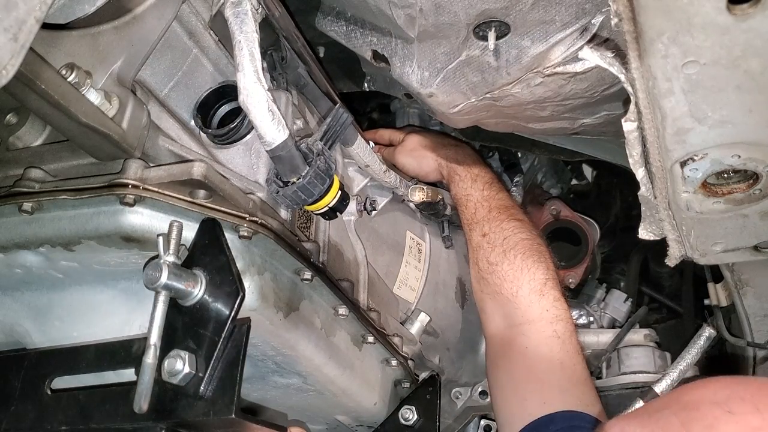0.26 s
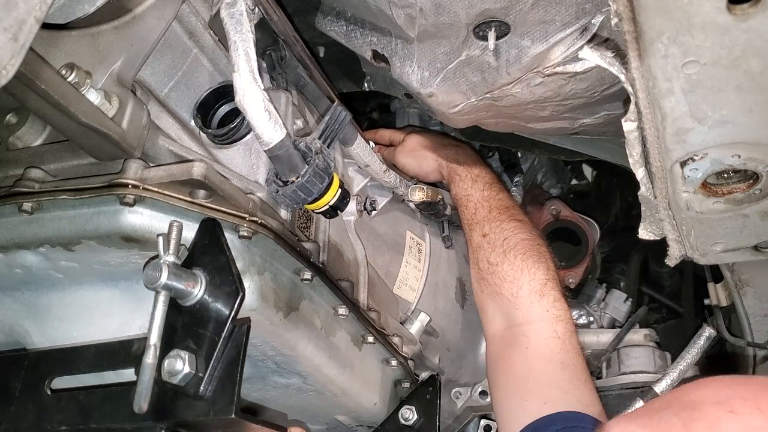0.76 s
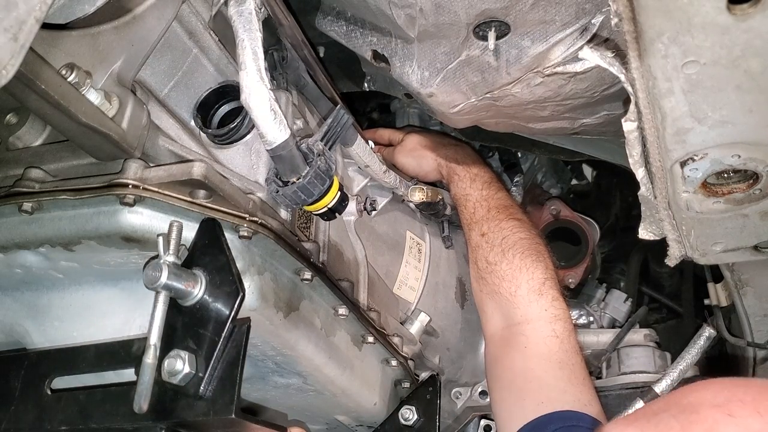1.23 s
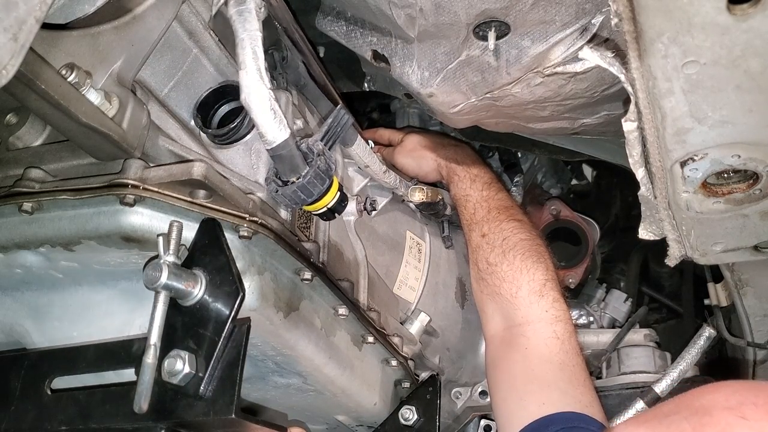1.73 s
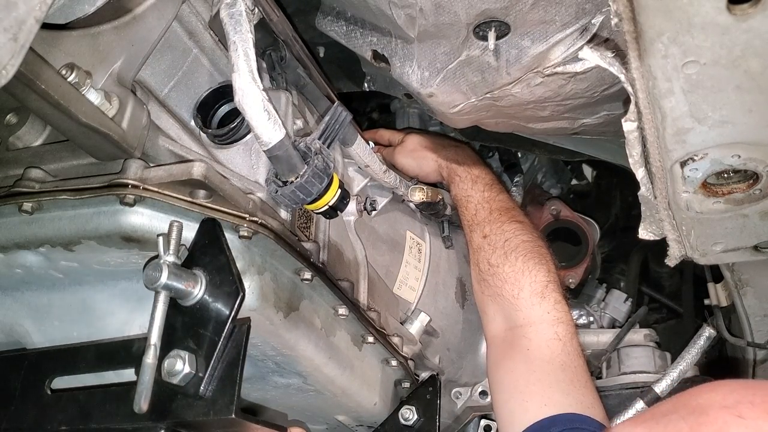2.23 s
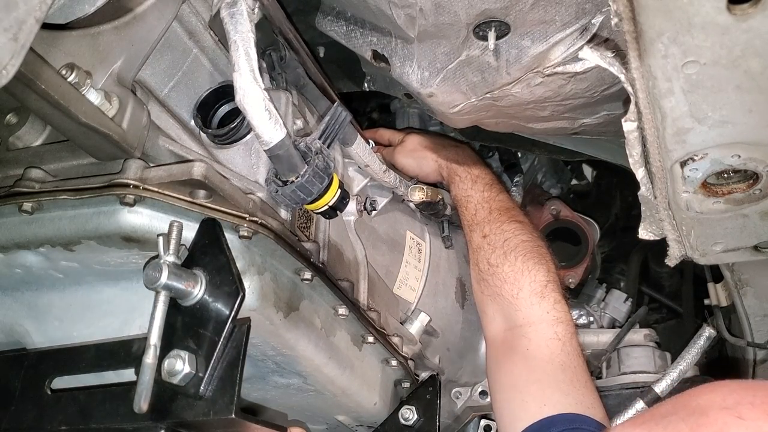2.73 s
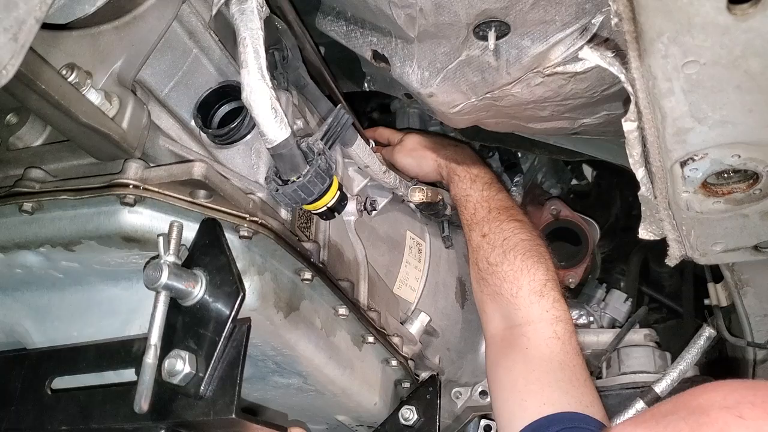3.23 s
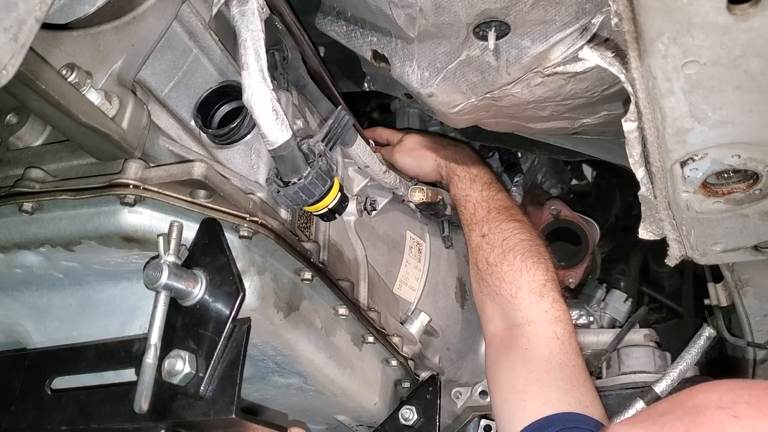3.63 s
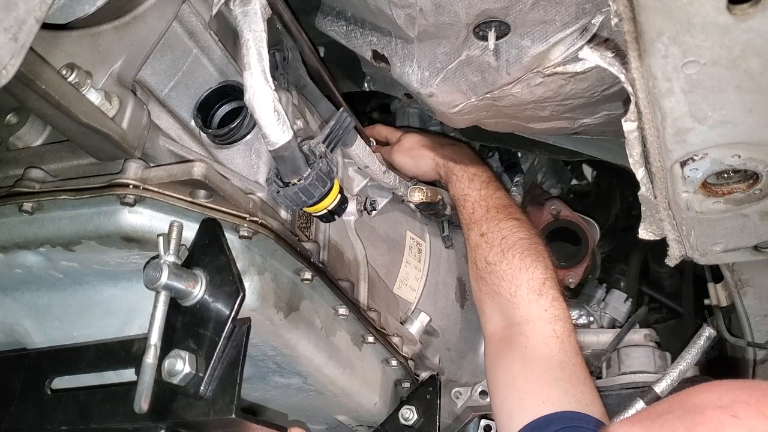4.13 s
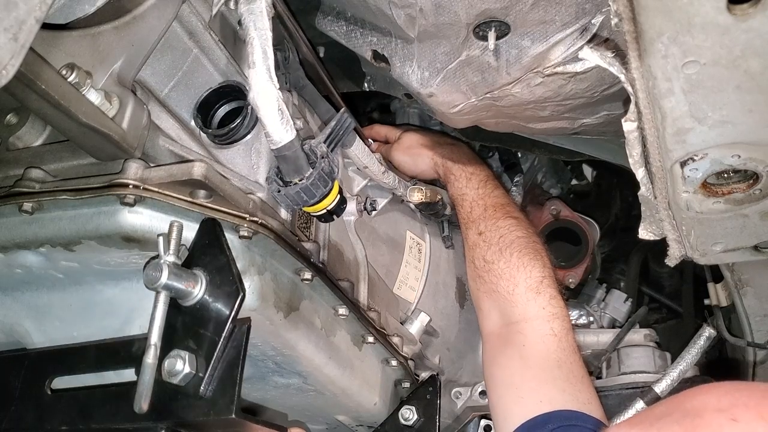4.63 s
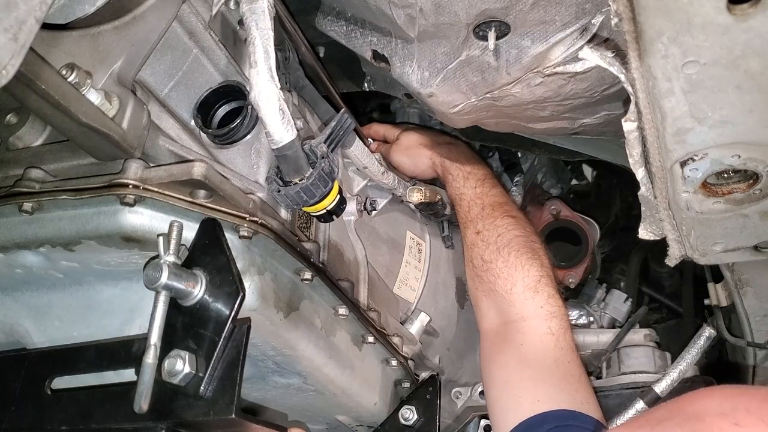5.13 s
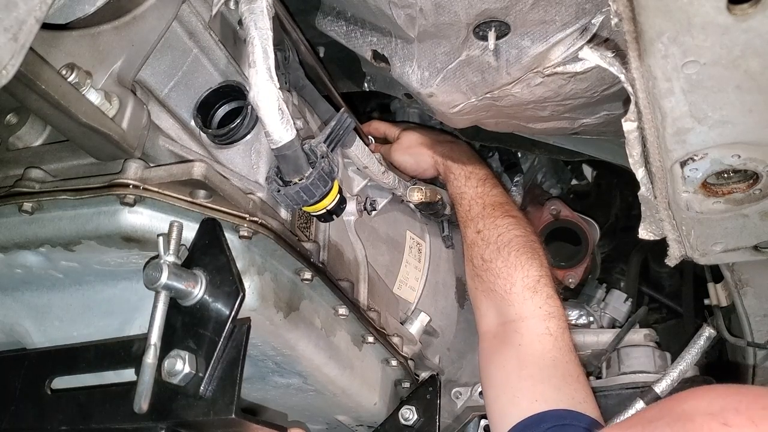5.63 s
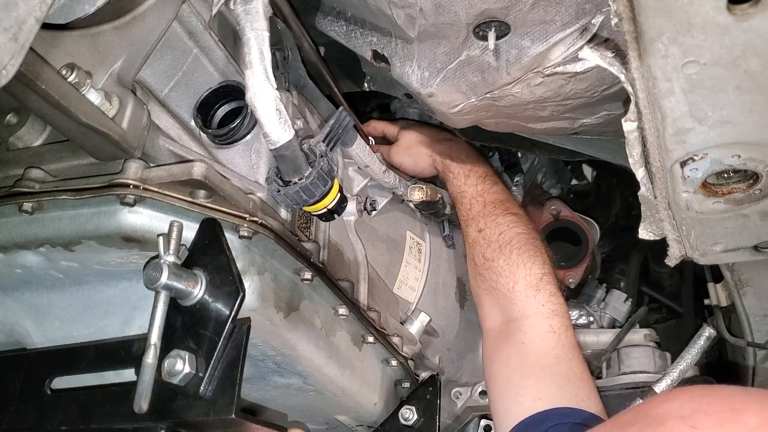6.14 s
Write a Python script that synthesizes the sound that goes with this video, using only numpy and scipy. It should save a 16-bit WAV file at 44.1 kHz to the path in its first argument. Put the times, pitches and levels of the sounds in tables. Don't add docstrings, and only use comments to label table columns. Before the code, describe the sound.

Inside a garage, a low machine hum swells. A trigger clicks and a cordless ratchet close by bursts into harsh metallic clatter, straining at a tight bolt for about half a second before speeding up. It coasts into separating ticks, with small scrapes and soft knocks in the pause. A second pull spins up fast and runs on as an even, softer rattling buzz with a growing gear whine. Close stereo microphone, tool to the left.

```python
import sys
import numpy as np
from scipy import signal
from scipy.fft import rfft, irfft, next_fast_len
from scipy.io import wavfile
from scipy.ndimage import uniform_filter1d, minimum_filter1d

SR = 44100
rng = np.random.default_rng(int(sys.argv[2]) if len(sys.argv) > 2 else 0)


def dump_mix(stems):
    frames = np.atleast_2d(stems).T
    limited = np.clip(frames, -1, 1)
    pcm = np.round(limited * 32767).astype(np.int16)
    wavfile.write(sys.argv[1], SR, pcm)


def linear_from_db(decibels):
    return 10 ** (np.asarray(decibels, float) / 20)


N = 280917
TIME = np.arange(N) / SR
PAUSE_S = 2.35
PORT_LAG = 20.67

# start in seconds, rise in seconds, rise in dB per decade of time, held level in dB.
RUNS = [
    (.931, 0.1, 13.5, -16),
    (2.67, 0.13, 45, -20),
]


def after(s):
    return np.maximum(TIME - s, 0)


def shape(rows, k, size):
    rows = np.array(rows, float)
    return np.interp(np.log(np.fft.rfftfreq(size, 1 / SR) + 1), np.log(rows[:, 0]), rows[:, k])


def unit(x):
    return x / np.sqrt(np.mean(x ** 2))


def band(x, lo_hz, hi_hz):
    return signal.sosfilt(signal.butter(3, [lo_hz, hi_hz], "band", fs=SR, output="sos"), x)


def walk(rate):
    k = int(SR / rate)
    held = np.repeat(rng.standard_normal(800), k)[:N]
    return unit(uniform_filter1d(uniform_filter1d(held, k), k))


def fade(x, ms):
    r = np.exp(-2000 / (ms * SR))
    return signal.lfilter([1 - r], [1, -r], x)


def ports(direct, other, share=0.98):
    # frequency in Hz, left minus right in dB, likeness of the ports from 0 to 1.
    port_rows = [(60, 0, 1), (200, 4, 0.94), (400, 5.5, 0.87), (682, 7, 0.76), (1300, 2.5, 0.18),
                 (2200, 6, 0), (4250, 7, 0), (6160, 15, 0.92), (8000, 7, 0.05), (9460, 2.5, 0.54),
                 (10670, 11.5, 0), (13740, 16.5, 0.2), (15350, 16.5, .3)]
    size = next_fast_len(N)
    like = np.clip(shape(port_rows, 2, size), 0, 1)
    late = np.exp(-2j * np.pi * np.arange(size // 2 + 1) * PORT_LAG * share / size)
    right = like * late * rfft(direct, size) + np.sqrt(1 - like ** 2) * rfft(other, size)
    right = right * linear_from_db(-share * shape(port_rows, 1, size))
    return np.array([direct, irfft(right, size)[:N]])


def shop():
    # frequency in Hz, level in dB per Hz.
    wash_rows = [(25, -21.5), (45, -28), (95, -6.5), (190, -15.5), (300, -19), (600, -25.5), (1100, -27.5),
                 (2000, -29.5), (4000, -34), (6800, -39), (7400, -46), (10000, -47.5), (13500, -46),
                 (15900, -61)]
    # frequency in Hz, width in Hz, level in dB.
    hum_rows = [(60.6, 19, -6.5), (87.6, 9.6, 5), (120.8, 3.8, -6), (263, 39, -13.5), (404, 11.5, -14.5),
                (575, 19, -17), (824, 35, -17.5)]
    size = next_fast_len(N)
    hz = np.fft.rfftfreq(size, 1 / SR)
    hum = sum(linear_from_db(db) ** 2 / (1 + ((hz - f) / width * 2) ** 4) for f, width, db in hum_rows)
    colour = np.sqrt(linear_from_db(shape(wash_rows, 1, size)) ** 2 + hum)
    paths = irfft(rfft(rng.standard_normal((2, size))) * colour, size)[:, :N]
    wash = ports(*paths, share=0.41)
    start_s = RUNS[0][0]
    swell_db = np.interp(TIME, [0.26, start_s], [0, 6])
    duck_db = -18.5 * (1 - np.exp(-after(start_s) / 0.39))
    return wash / np.std(band(wash.mean(0), 40, 125)) * linear_from_db(-45.5 + swell_db + duck_db)


def bumps():
    # start in seconds, frequency in Hz, peak level in dB, decay in ms.
    thuds = [
        (.859, 4600, -33, 1.8),
        (.866, 4200, -35, 3),
        (.9, 260, -49, 21),
        (.968, 900, -29, 9.9),
        (2.268, 205, -50.5, 21),
        (2.367, 189, -48, 23),
        (2.398, 1130, -46.5, 10),
        (2.787, 165, -41, 10),
        (2.839, 152, -43, 40),
        (2.84, 970, -35, 40),
    ]
    scrapes = [
        (2.094, 3160, -30, 6.1),
        (2.094, 11000, -28, 4),
        (2.246, 11000, -48, 3.9),
        (2.246, 4500, -46.5, 5.4),
        (2.398, 2660, -47.5, 7.3),
        (2.639, 4500, -52, 2.9),
    ]
    pings = [
        (.0, 2030, -55, 60),
        (1.006, 8600, -12, 4),
        (2.636, 6800, -59, 7),
    ]
    contact = [(0.3, 0.24), (0.88, 0.46), (.08, 0.1)]
    out, ms = np.zeros((2, N + 8192)), np.arange(8192) / SR * 1000
    for table, (wide, soft) in zip((thuds, scrapes, pings), contact):
        for s, hz, db, decay_ms in table:
            width, rise_ms = wide * hz, soft * decay_ms
            swell = (1 - np.exp(-ms / rise_ms)) ** 2 * np.exp(-ms / decay_ms)
            noise = band(rng.standard_normal((2, 16384)), hz - width / 2, hz + width / 2)[:, 8192:] * swell
            i = int(s * SR)
            out[:, i:i + 8192] += linear_from_db(db) * noise / abs(noise).max(1, keepdims=True)
    return out[:, :N] * linear_from_db(5.5)


def whine():
    # start in seconds, end in seconds, frequency in Hz, level in dB.
    whines = [
        (0.905, 0.928, 8000, -35.5),
        (2.658, 2.705, 8000, -61),
    ]
    out = 0
    for t0, t1, hz, db in whines:
        swell = np.interp(TIME, [t0, t0 + .7 * (t1 - t0), t1], [0, 1, .3], 0, 0)
        out = out + linear_from_db(db) * swell * np.sin(2 * np.pi * hz * TIME)
    return out


def gears(speed):
    # multiple of the crank rate, level in dB.
    orders = [(1, -65), (2, -68.5), (3, -64), (4, -63), (5, -69.5), (6, -90.5), (10, -63)]
    angle = 2 * np.pi * np.cumsum(uniform_filter1d(speed, SR // 10)) / SR
    shake = sum(linear_from_db(db + 3.8 * walk(rate=4.4)) * np.sin(k * angle + k * k) for k, db in orders)
    shake = shake * np.clip((speed - 15) / 30, 0, 1) * linear_from_db(9.5 * (TIME < PAUSE_S))
    mesh_teeth, freed_s = 42, 3.76
    mesh_hz = mesh_teeth * uniform_filter1d(speed, SR // 2) + 14.0 * walk(rate=12)
    mesh = np.sin(2 * np.pi * np.cumsum(mesh_hz) / SR)
    mesh_db = np.where(TIME < freed_s, -65, -51 + 4.5 * after(freed_s))
    mesh_db = uniform_filter1d(mesh_db, SR // 10) + 4.5 + 2.1 * walk(rate=15)
    return shake + mesh * linear_from_db(mesh_db) * (speed > 51)


def burst(decay_ms, tail_db, tail_ms):
    t = np.arange(4096) / SR * 1000
    fall = 2.1 * np.exp(-t / 0.81) + np.exp(-t / decay_ms) + linear_from_db(tail_db) * np.exp(-t / tail_ms)
    return rng.standard_normal((2, len(t))) * fall


def ticks():
    # start in seconds, peak level in dB, dull share in dB.
    pawl = [
        (0.497, -15.5, -14.5),
        (1.7409, -10.5, -8),
        (1.871, -8.5, -31),
        (2.0542, -13.5, -14),
        (2.171, -14.5, -17),
        (2.2055, -15.5, -14),
        (2.7281, -6.5, -22),
    ]
    slack = [(0.86, -31, -6), (0.898, -42, -14.5), (0.9327, -0.5, -14), (0.9497, -2, -9),
             (0.9645, -5.5, -21), (0.988, -15, -21), (0.9986, -6, -6), (1.0063, -7, -25.5),
             (1.5894, -14, 1), (1.6604, -12, -6), (1.6886, -15, -5), (1.7511, -6, -19), (1.7933, -27, -6),
             (1.8556, -17, -23), (2.035, -30, -7), (2.3092, -46, -6), (2.3997, -44, -7), (2.6399, -50, -11),
             (2.7, -37, -12), (2.7153, -20, -15)]
    strain = [
        (1.0284, -8, -3.5),
        (1.0364, -22, -7.5),
        (1.0444, -9, -3),
        (1.0574, -4, 0.5),
        (1.0664, -4, -4),
        (1.0754, -18, -1),
        (1.1014, -5.5, -11),
        (1.1124, -10, -7),
        (1.1194, -5, -3.5),
        (1.1374, -5.5, -9),
    ]
    knock_rows = [(*row, 3.6) for row in pawl] + [(*row, 2.6) for row in slack + strain]
    pan_db = np.array([[0], [13.5]])
    out = np.zeros((2, N + 4096))
    for s, db, dull_db, decay_ms in knock_rows:
        crack = burst(decay_ms, -17, 9.0)
        crack[1] = .5 * np.roll(crack[0], int(PORT_LAG)) + 0.85 * crack[1]
        bright, dull = band(crack, 6900, 15350), band(crack, 1900, 7100)
        tick = bright / abs(bright).max() + linear_from_db(dull_db + 9.5) * dull / abs(dull).max()
        tick = tick / abs(tick[0]).max() * linear_from_db(db + 2.5 - pan_db)
        i = int(s * SR)
        out[:, i:i + 4096] += tick
    return out[:, :N]


def effort():
    first, second = (db + slope_db * np.log10(np.clip(after(s) / rise, 1e-5, 1))
                     for s, rise, slope_db, db in RUNS)
    start_s, rise_s = RUNS[0][:2]
    breaks_free_s, recover_s = 1.41, 0.19
    sag_s = [start_s + rise_s, breaks_free_s, breaks_free_s + recover_s]
    first = first + np.interp(TIME, sag_s, [0, -2, 0])
    release_s, stall_s, last_tooth_s = 1.565, 2.076, 2.28
    first = first - 58.5 * after(release_s) - 47 * after(stall_s) - 200 * after(last_tooth_s)
    return np.where(TIME < start_s, -120, np.maximum(first, second))


def balance(k, head_db):
    # tight level in dB, free level in dB,
    # gain in dB per second as the bolt loosens, dB gained per dB of slowing.
    parts = [
        (-7, -12.5, 1.1, 0.01),
        (-20.5, -24.5, 0.75, 0.4432),
    ]
    if k == 0:
        return 0.65 * walk(rate=14)
    tight_db, free_db, loosen_db, slowing = parts[k - 1]
    running = after(RUNS[1][0])
    settle_db = 6.5 * np.exp(-running / 0.27)
    held = np.where(TIME < PAUSE_S, tight_db, free_db + loosen_db * running + settle_db)
    return held + slowing * np.clip(RUNS[1][3] - head_db, 0, 36)


def ring(x, hz, t60):
    r = np.exp(-np.log(1000) / (t60 * SR))
    return unit(signal.lfilter([1, 0, -1], [1, -2 * r * np.cos(2 * np.pi * hz / SR), r * r], x))


def knocks(stroke_db, speed, per_turn, scatter_db):
    draw = rng.random(N) / (per_turn * speed / SR)
    hit, power = draw < 1, np.zeros(N)
    size_db = np.minimum(-scatter_db * np.log(draw[hit] + 1e-9), 10.5) + stroke_db[hit]
    power[hit] = linear_from_db(2 * size_db) / speed[hit]
    return power


def clatter(turns, speed):
    # frequency in Hz, level in dB per Hz.
    tight_colour = [(76, -45), (130, -23), (363, -29), (531, -12.5), (718, -17.5), (1420, -16), (1610, -13),
                    (2760, 0), (3380, -3.5), (4220, -1), (5370, -5), (6430, -1), (7710, -10), (13500, 5),
                    (15900, 2.5)]
    free_colour = [(76, -53), (130, -26.5), (162, -30), (355, -29.5), (553, -17), (1450, -18.5),
                   (1890, -9.5), (2310, -5), (4050, -7), (6180, -6), (7710, -13.5), (8870, -9.5),
                   (11100, -7.5), (13500, -1), (15900, -9)]
    # frequency in Hz, level in dB, time to fall by 60 dB in seconds.
    steel = [(13580, -5, 0.0097), (9670, -1.5, 0.024), (8680, -8, 0.03), (4240, -9, 0.0053),
             (2783, -10, 0.019), (1907, -9.5, 0.039), (1234, -13.5, 0.1), (938, -14.5, 0.047),
             (541, -19.5, 0.033)]
    angle = 2 * np.pi * (turns + 0.0046 + 0.11 * walk(rate=12))
    stroke = np.tanh(2.0 * np.cos(angle)) - 0.26 * np.cos(3 * angle + 0.8) - 0.067 * np.cos(4 * angle + 0.27)
    tight = TIME < PAUSE_S
    shared_db = 2.1 * stroke + np.minimum(3.7 * walk(rate=30), 4.5) + 0.16 * walk(rate=9.0)
    shared = knocks(shared_db, speed, 15.0, 1.48)
    size = next_fast_len(N)
    hz = np.fft.rfftfreq(size, 1 / SR) + 1
    high, mid = (1 / (1 + (edge / hz) ** 8) for edge in (5500, 1600))
    shares = high, mid - high, (1 - mid) / (1 + (130 / hz) ** 4)
    colours = [linear_from_db(shape(table, 1, size)) for table in (tight_colour, free_colour)]
    head_db = effort()
    load_db, load_pan_db = -5, 3.5
    out = 0
    for k, (crack_ms, own, rub) in enumerate([(.9, 0.49, 0.047), (1.3, 1.6, 0.8), (2.5, 3, 1)]):
        power = shared + own * knocks(6.8 * stroke + 1.2 * walk(rate=20), speed, 12.0, 1.6)
        power = fade(power, crack_ms) + .5 * fade(power, 6.0) + rub * power.mean()
        power = power * (power.mean() / uniform_filter1d(power, 1600)) ** .45
        paths = unit(np.sqrt(power) * rng.standard_normal((2, N)))
        hard = np.sqrt(knocks(1.18 * stroke, speed, 1.2, 1.2)) * linear_from_db(load_db * tight * (k > 0))
        for f, db, t60 in steel[3 * k:3 * k + 3]:
            grip_db = 1.5 * walk(rate=9) + 2.5 * walk(rate=2.5)
            struck = hard * (rng.random(N) < .55)
            paths = paths + linear_from_db(db - 16.0 + grip_db) * ring(struck, f, t60)
        spectrum = rfft(paths, size) * np.sqrt(shares[k])
        held, free = (unit(irfft(spectrum * colour, size)[:, :N]) for colour in colours)
        part = ports(*np.where(tight, held, free))
        out = out + part / np.std(part.mean(0)) * linear_from_db(balance(k, head_db))
    pan_db = load_pan_db * tight * np.array([[.1], [-.9]])
    return out * linear_from_db(head_db + pan_db)


def crank():
    # start in seconds, turns per second held until the next row.
    speed_rows = [(.9, 31.95), (1.1, 37.83), (1.4, 47), (1.47, 52.5), (1.55, 47.6), (1.6, 40), (1.7, 28.3),
                  (1.8, 22.8), (1.9, 15.375), (2.3, 5.263), (2.68, 11.5), (2.74, 38.67), (2.8, 52),
                  (2.9, 54.51), (3.25, 55.28), (4.0, 54.67)]
    steps = np.array([(0, 0)] + speed_rows)
    held = steps[np.searchsorted(steps[:, 0], TIME, "right") - 1, 1]
    smooth = uniform_filter1d(held, SR // 20, mode="nearest")
    return .65 + np.cumsum(smooth) / SR, np.maximum(smooth, 8)


def scene():
    turns, speed = crank()
    near = bumps() + gears(speed) + whine()
    return clatter(turns, speed) + ports(*near) + ticks() + shop()


def band_limit(x):
    return signal.sosfilt(signal.butter(12, 16830, fs=SR, output="sos"), x)


def record(dry):
    peak = uniform_filter1d(-minimum_filter1d(-abs(dry), 41), 21)
    limited = dry / (1 + (peak / .8) ** 6) ** (1 / 6)
    top_cut = signal.ellip(14, .2, 95, 15730, fs=SR, output="sos")
    mix = signal.sosfilt(top_cut, limited)
    return band_limit(mix)


dry = scene()
out = record(dry)
dump_mix(out)
```